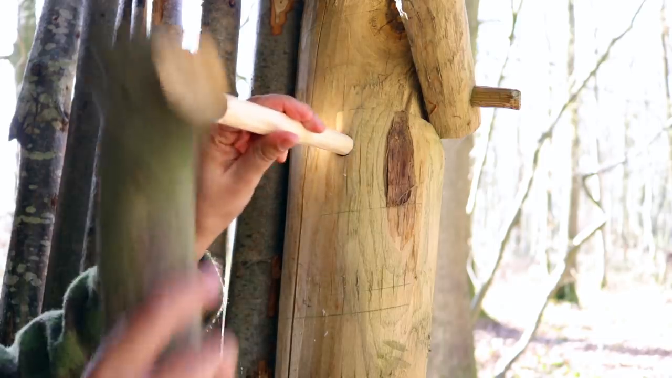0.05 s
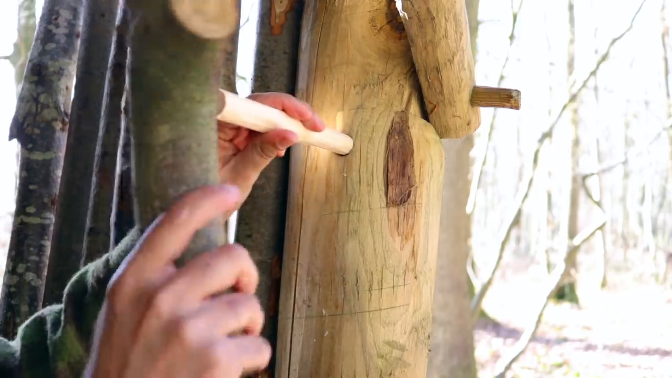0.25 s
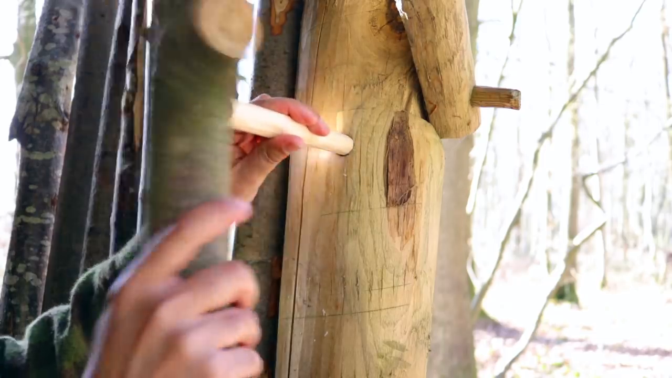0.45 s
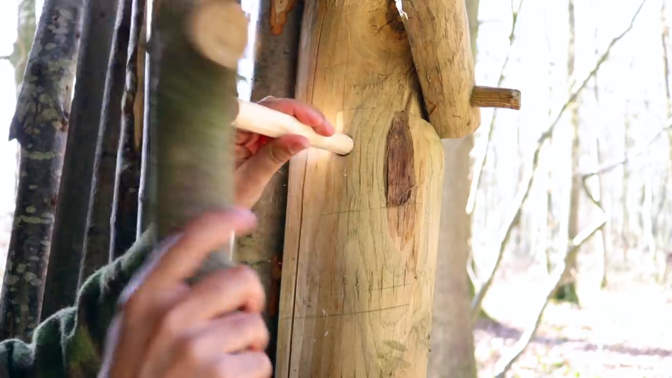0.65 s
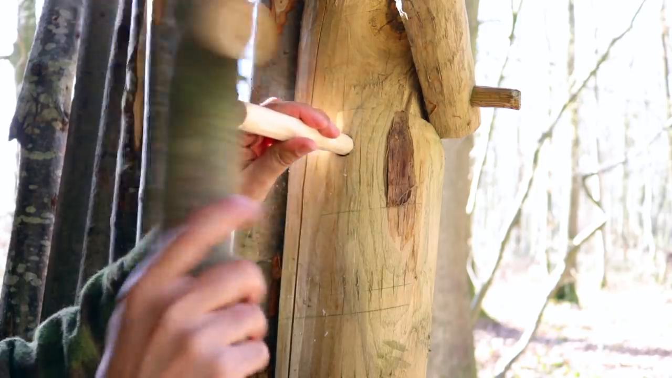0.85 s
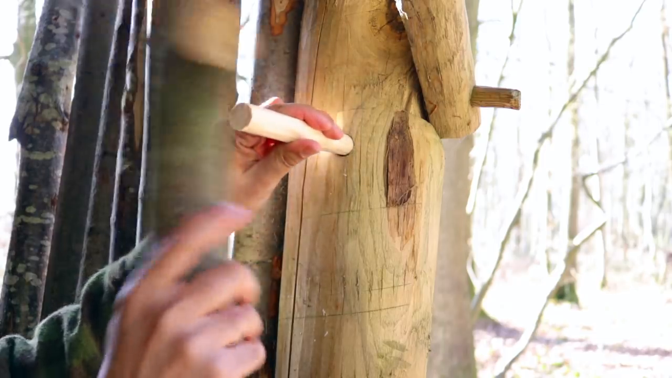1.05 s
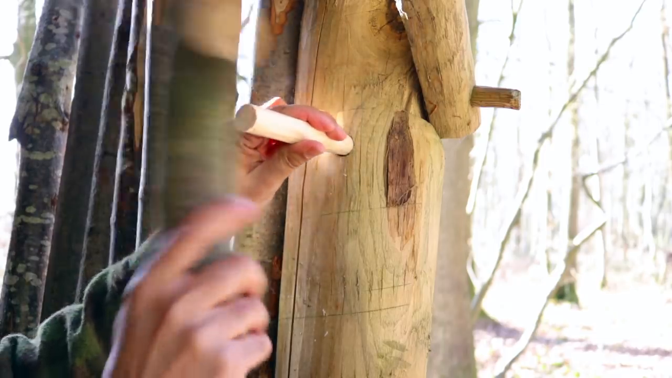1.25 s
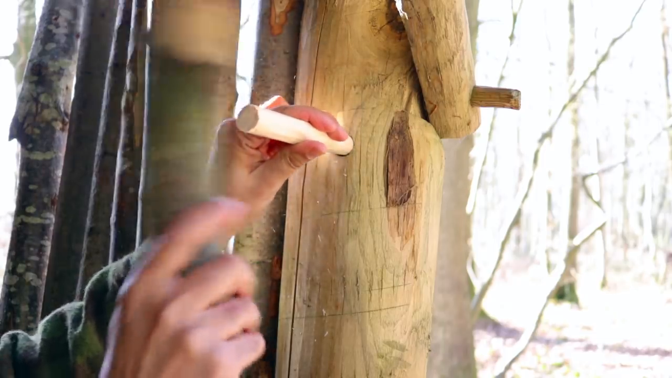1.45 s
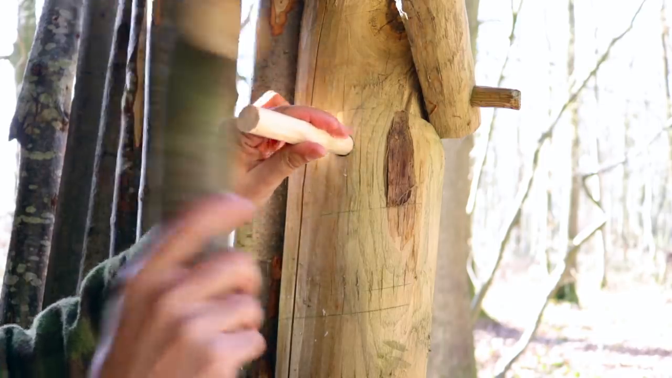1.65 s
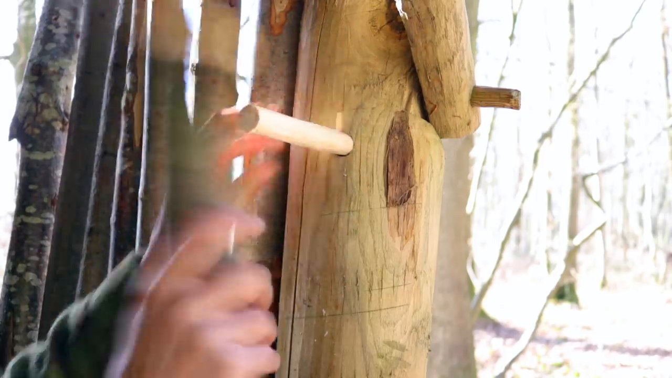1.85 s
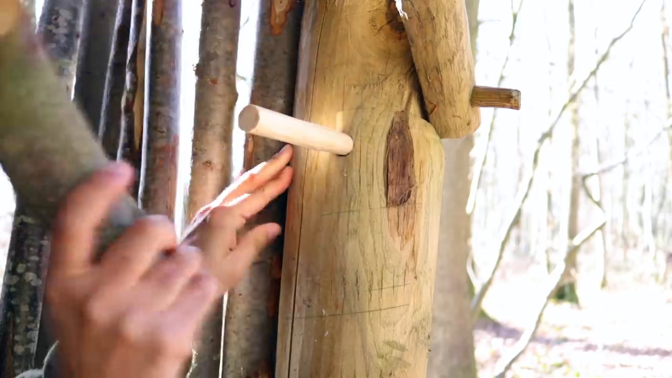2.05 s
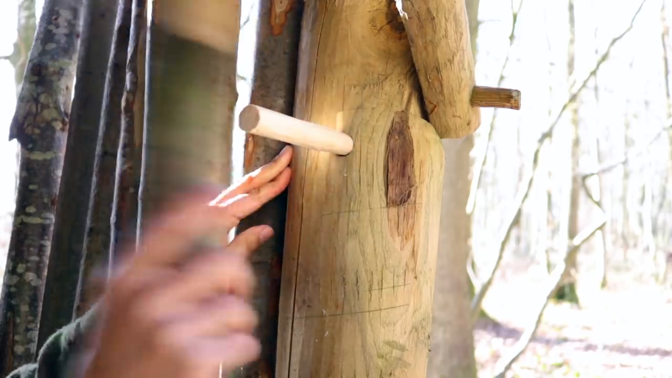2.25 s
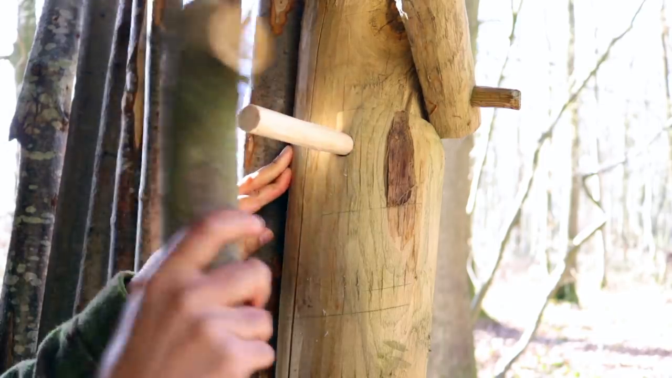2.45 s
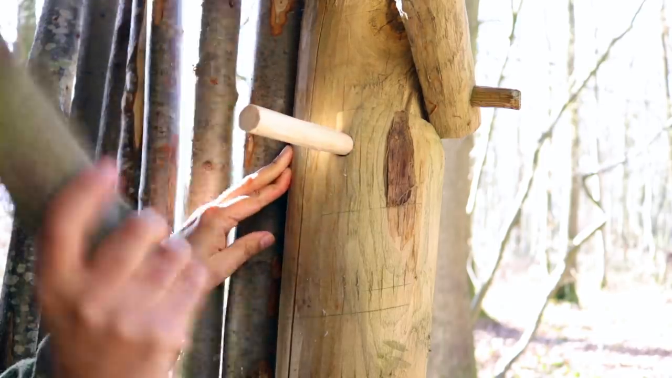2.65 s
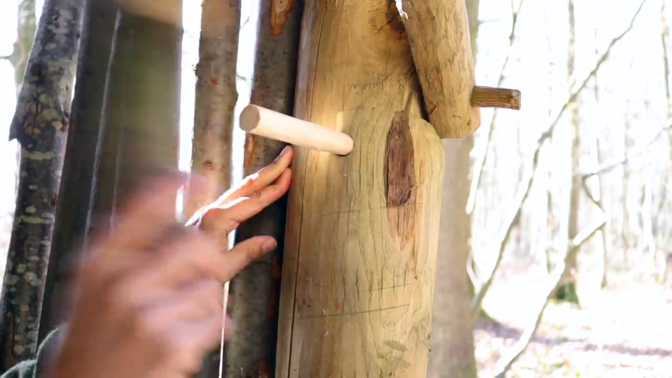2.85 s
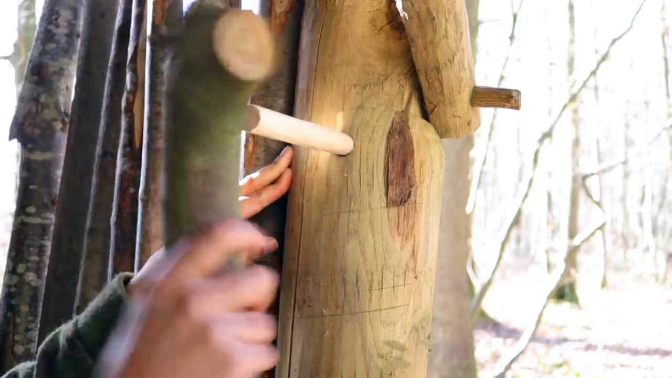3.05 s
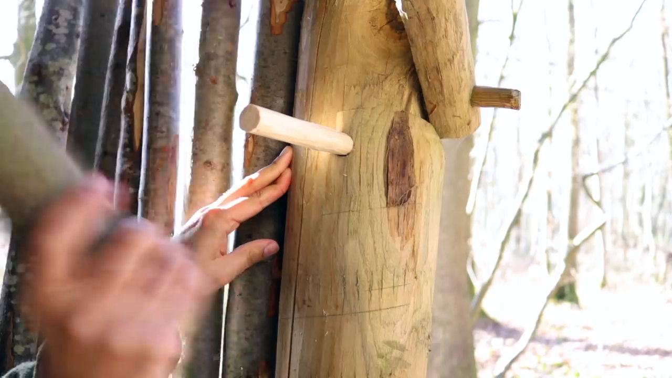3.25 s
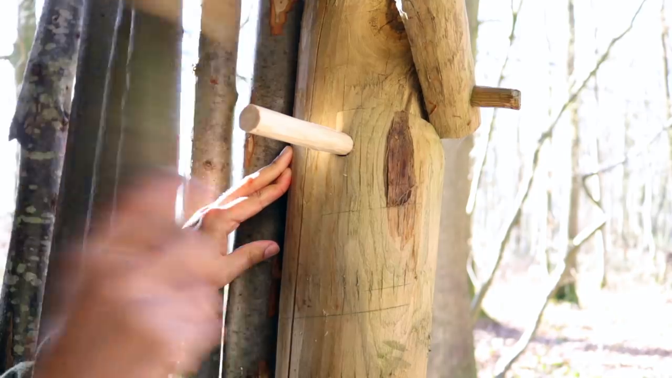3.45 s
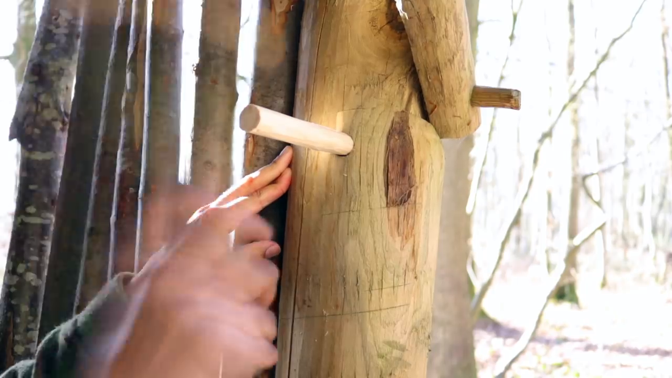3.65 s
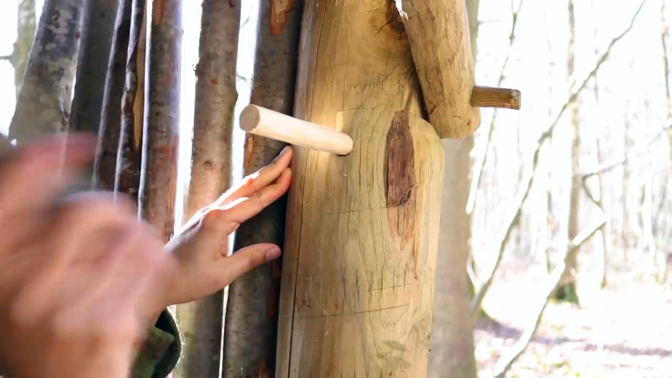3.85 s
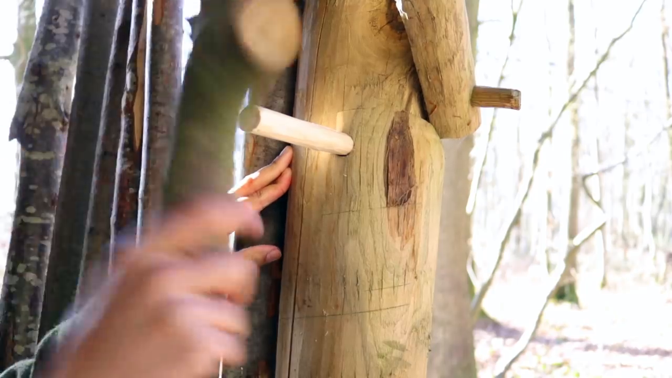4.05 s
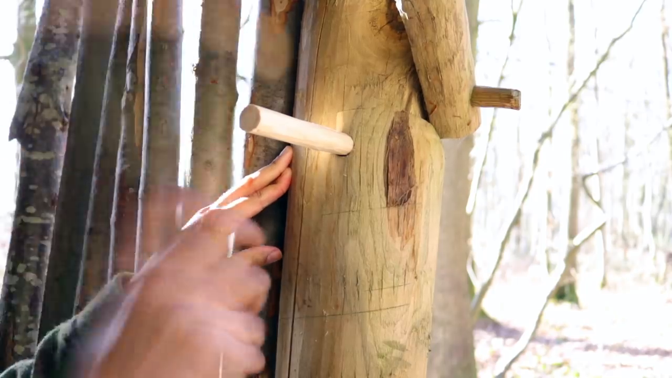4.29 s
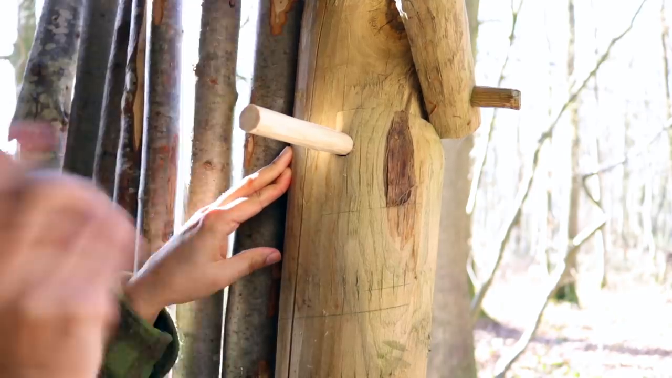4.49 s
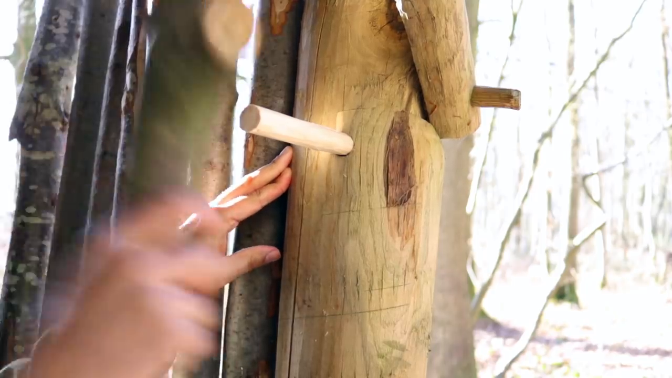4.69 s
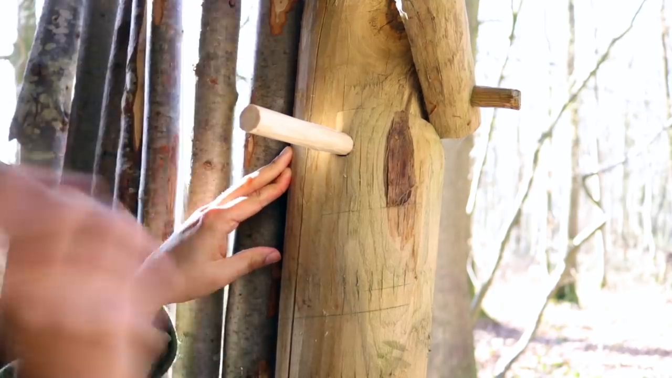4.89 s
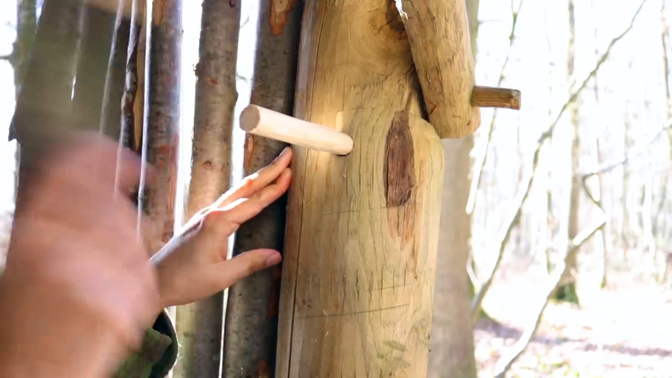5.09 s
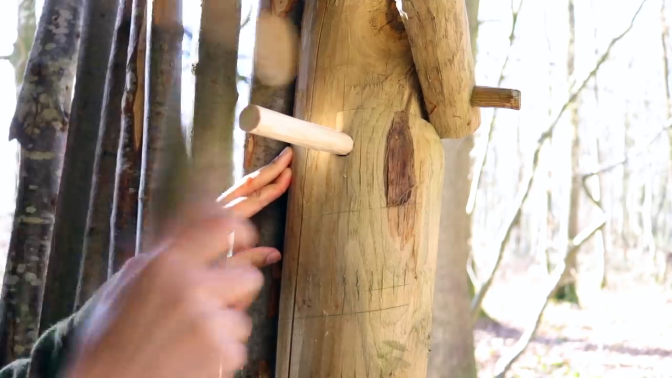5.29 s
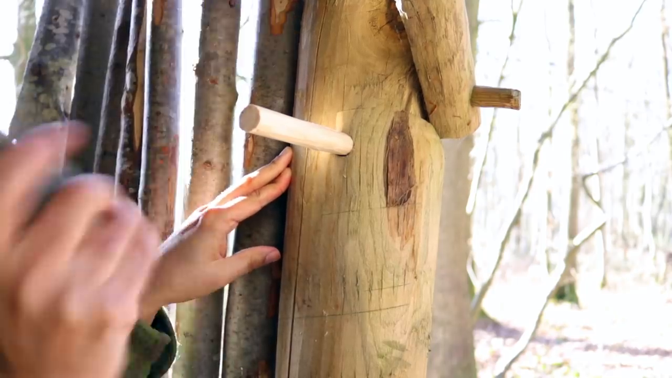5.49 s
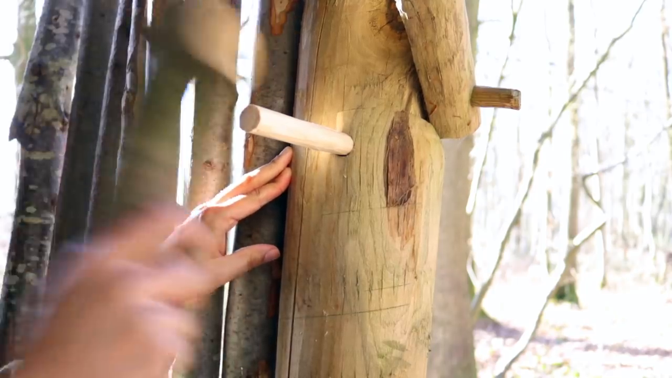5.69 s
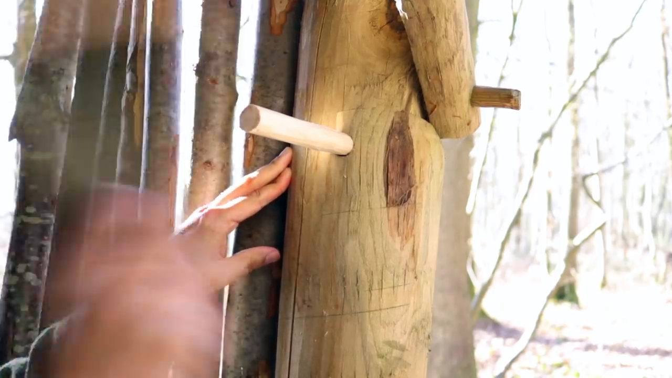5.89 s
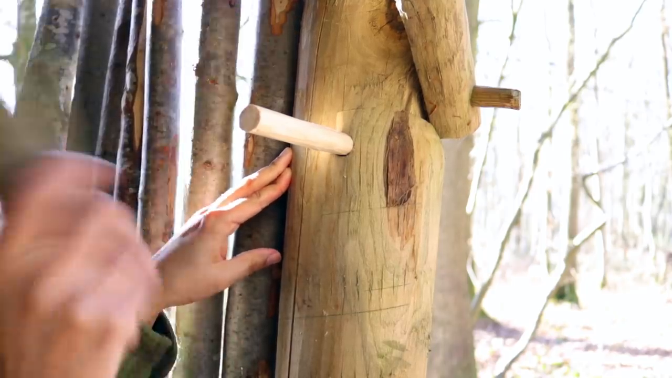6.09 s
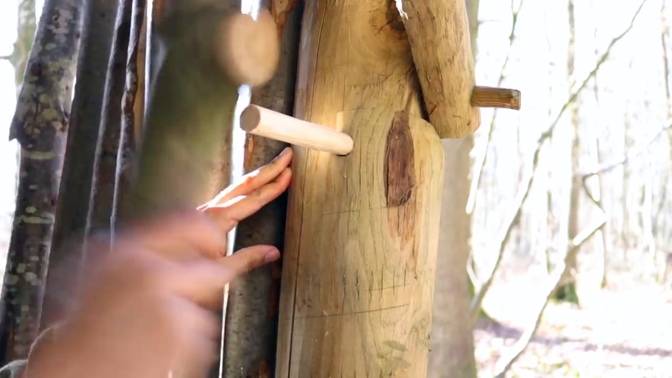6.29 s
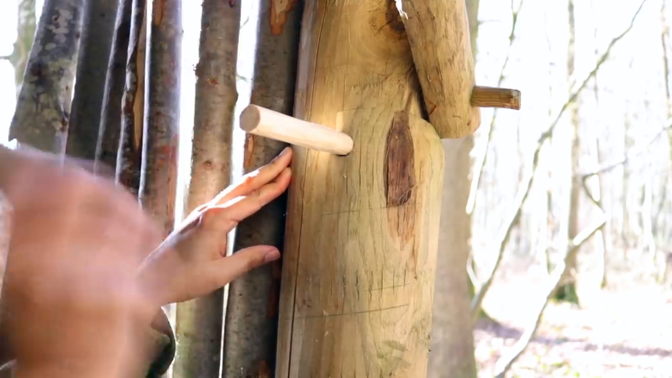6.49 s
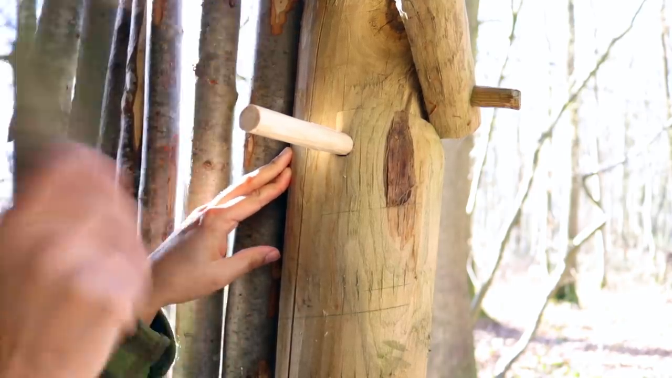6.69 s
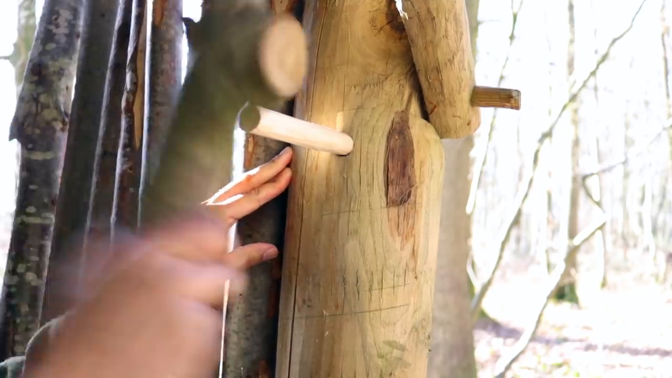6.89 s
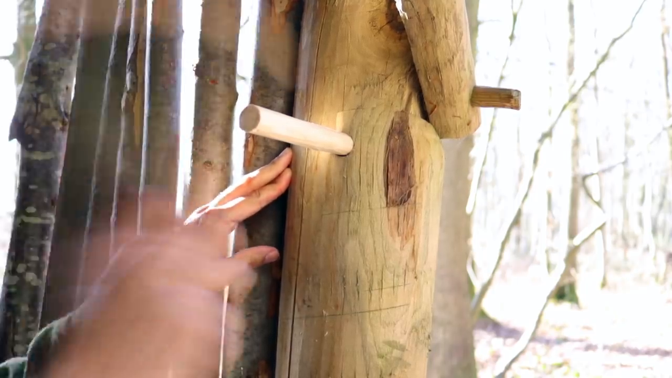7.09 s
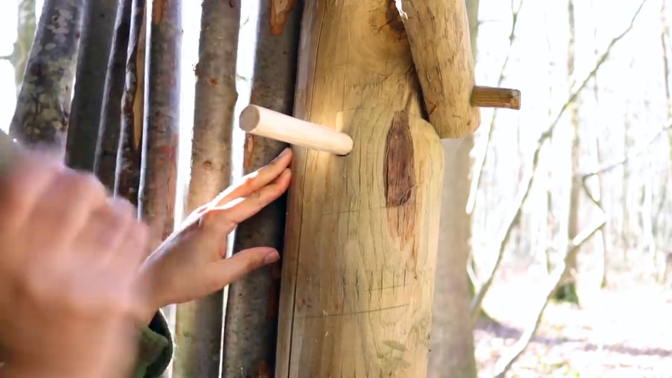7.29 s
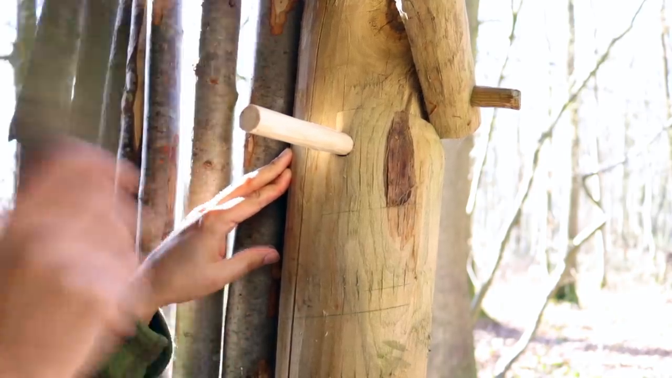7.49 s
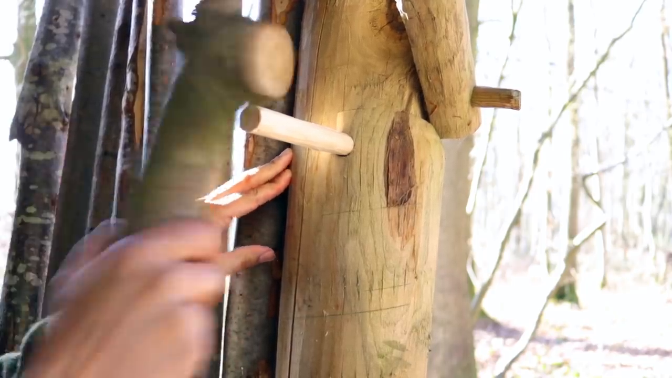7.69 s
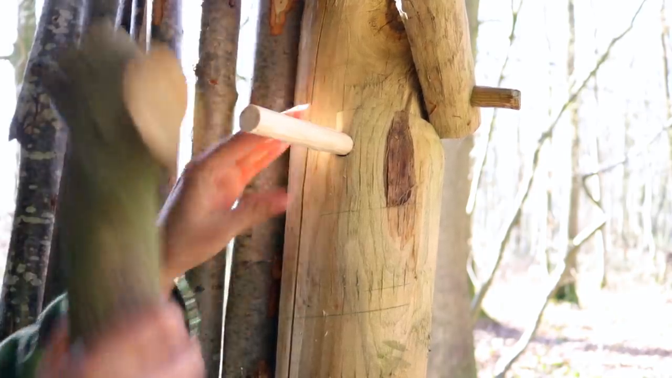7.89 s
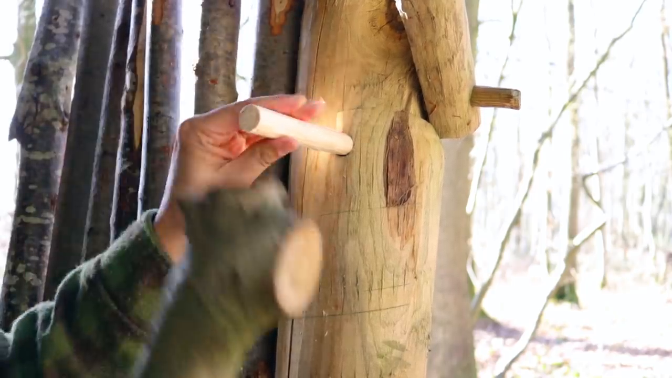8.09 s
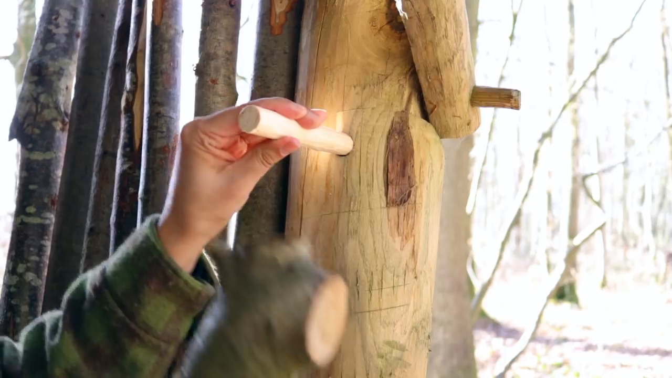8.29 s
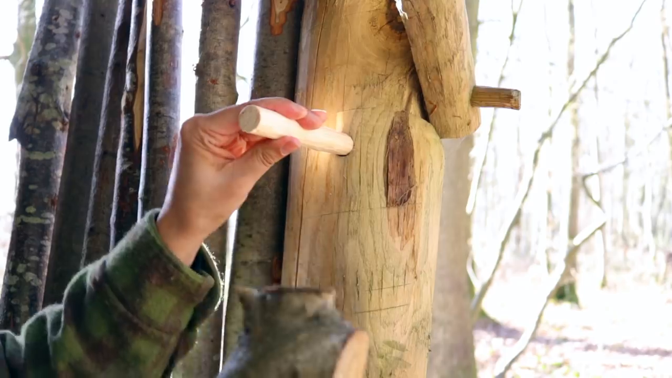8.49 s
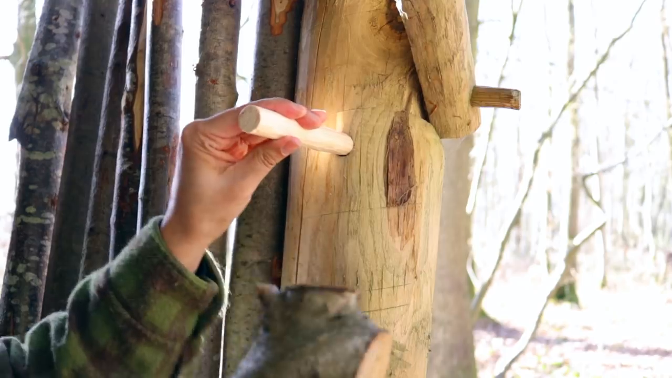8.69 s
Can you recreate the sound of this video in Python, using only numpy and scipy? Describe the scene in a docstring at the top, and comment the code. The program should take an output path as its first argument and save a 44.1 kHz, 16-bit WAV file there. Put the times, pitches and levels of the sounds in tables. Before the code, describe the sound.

A branch mallet hammers a wooden dowel into a timber post, light clacks turning to loud booming knocks, with a faint bird in quiet woodland.

```python
"""A mallet cut from a branch drives a dowel into a timber post in a wood, close to the microphone.
Each blow rings the dowel's modes; once it grips, the post's modes boom and overload the recorder.
The trunks scatter each blow back as decaying noise, and one narrow-band echo follows.
A small bird sings falling notes as gliding sine tones, over a hush of coloured noise and two faint ticks."""
import sys
import numpy as np
from scipy import signal
from scipy.fft import rfft, irfft
from scipy.io import wavfile
from scipy.ndimage import uniform_filter1d

SR = 44100
rng = np.random.default_rng(int(sys.argv[2]) if len(sys.argv) > 2 else 0)


def generate_wav(signal):
    """Clip the signal to [-1, 1] and save it as 16-bit WAV at the path in sys.argv[1]."""
    frames = np.transpose(np.atleast_2d(signal))
    scaled = np.clip(frames, -1, 1) * 32767
    pcm = np.round(scaled).astype(np.int16)
    wavfile.write(sys.argv[1], SR, pcm)


N = 385343  # samples in the scene
T = np.arange(SR) / SR  # one second of time, s
KNOCK = SR // 5  # samples in one knock


def undb(db):
    """Level: an amplitude gain is 10 to the power of dB / 20."""
    return 10 ** (np.asarray(db) / 20)


def decay(t60, t=T):
    """Exponential damping: the amplitude falls by 60 dB in each t60 seconds."""
    return np.exp(-np.log(1000) * t / t60)


def add(track, start_s, sound):
    """Superposition: pressures sum, here from a given time onwards."""
    i = int(round(start_s * SR))
    track[i:i + len(sound)] += sound[:len(track) - i]


def coloured_noise(size, points):
    """Spectral shaping: white noise weighted by (f/Hz, level/dB, ..) points, brought to an rms of 1."""
    hz, db = np.transpose(points)[:2]
    log_f = np.log(np.maximum(np.fft.rfftfreq(size, 1 / SR), 1))
    gain = undb(np.interp(log_f, np.log(hz), db))
    noise = irfft(rfft(rng.standard_normal(size)) * gain, size)
    return noise / noise.std()


def noise_tail(points, size=KNOCK):
    """Frequency-dependent damping: each band of coloured noise dies at its own rate."""
    hz, _, t60 = np.transpose(points)
    spectrum = rfft(coloured_noise(size, points))
    log_f = np.log(np.maximum(np.fft.rfftfreq(size, 1 / SR), 1))
    # overlapping triangular bands that sum to one
    weights = np.array([np.interp(log_f, np.log(hz), band) for band in np.eye(len(hz))])
    bands = irfft(spectrum * weights, size)
    return np.sum(bands * decay(t60[:, None], T[:size]), axis=0)


def ring(modes, detune, scatter_db, signs=1):
    """Modal superposition: damped cosines, whose pitch and level vary by blow, most in the high modes."""
    hz, db, t60 = np.transpose(modes)
    chance = rng.standard_normal((2, len(hz))) * np.minimum(hz / 1500, 1)
    t = T[:KNOCK]
    mode_hz = hz * (1 + detune * chance[0])
    waves = np.cos(2 * np.pi * np.outer(mode_hz, t)) * decay(t60[:, None], t)
    return (signs * undb(db + scatter_db * chance[1])) @ waves


def alternate(modes):
    """Rod modes: seen from the far end, neighbouring modes swing opposite ways."""
    return (-1) ** np.arange(len(modes))


def push(response, contact_ms):
    """Convolution with the contact force: the longer the contact, the duller the sound."""
    u = T[:SR // 100] / (contact_ms / 4000)  # the force peaks a quarter of the way through the contact
    force = u * np.exp(-u)
    return np.convolve(response, force / force.sum())[:len(response)]


# still woodland air: columns f/Hz, relative spectral level/dB per Hz
AIR_SPECTRUM = [(20, -8.5), (70, 2), (110, -3.5), (230, -3.5), (700, -5), (1100, -5), (1500, -11.5),
                (2000, -20), (2800, -25), (5000, -29.5), (9000, -35), (16000, -34.5)]


def air(level_db=-67.5, swell_db=1.15):
    """Stationary noise, slowly modulated: a low hush that swells very slightly."""
    swell = np.interp(np.arange(N), np.linspace(0, N, 20), rng.standard_normal(20))
    return coloured_noise(N, AIR_SPECTRUM) * undb(level_db + swell_db * swell)


# the short rustling ring around the clack: columns f/Hz, relative level/dB per Hz, T60/s
RATTLE_BANDS = [(50, -10, 0.06), (160, -5, 0.12), (298, -6.5, 0.16), (600, -10.5, 0.17), (1210, -2.5, 0.13),
                (2000, -0.5, 0.11), (3600, -4, 0.077), (5040, -12.5, 0.077), (15000, -13, 0.051)]


def rattle():
    """Damped noise: a short rustle in which each band has its own decay time."""
    return noise_tail(RATTLE_BANDS)


# the clack of dowel and mallet head: columns f/Hz before each blow's pitch ratio, level/dB, T60/s
DOWEL_MODES = [(600, -14.5, 0.012), (1055, -7.5, 0.0095), (1317, -6.5, 0.013), (1610, -10, 0.016),
               (2055, -9.5, 0.014), (2885, -17, 0.016), (3400, -15, 0.013)]


def dowel(pitch, home_ms, home_share=0.4, rattle_db=-28, radiate_hz=420):
    """Double impact: mallet on dowel, then dowel in its hole. So small a peg radiates little bass."""
    modes = [(hz * pitch, db, t60) for hz, db, t60 in DOWEL_MODES]
    clack = ring(modes, detune=.02, scatter_db=1., signs=alternate(modes))
    radiation = signal.butter(1, radiate_hz, "high", fs=SR, output="sos")
    clack = signal.sosfilt(radiation, clack)
    both = clack + undb(rattle_db) * rattle()
    add(both, home_ms / 1000, home_share * clack)
    return both


POST_DETUNE, POST_SCATTER_DB = .005, 1.2  # fraction of pitch, dB

# the tightly gripped dowel under a hard blow: columns f/Hz, level/dB, T60/s
CRACK_MODES = [(2050, -9, 0.024), (2867, -16.5, 0.044), (3400, -6, .016), (4830, -9, .013),
               (6050, -11, 0.014), (8700, -21.5, 0.021)]


def crack(contact_ms):
    """Forced modal response: the contact force rings the high modes of the gripped dowel."""
    modes = ring(CRACK_MODES, POST_DETUNE, POST_SCATTER_DB, signs=alternate(CRACK_MODES))
    return push(modes, contact_ms)


# the dense, quickly dying ring of the wood fibres: columns f/Hz, relative level/dB per Hz, T60/s
GRAIN_BANDS = [(60, -11, 0.04), (201, -10.5, 0.13), (463, -6.5, 0.34), (960, -7.5, 0.18),
               (2000, -9.5, 0.072), (3300, -8.5, 0.1), (4860, -18.5, 0.078), (7000, -16.5, 0.037),
               (11100, -22.5, 0.022), (15000, -40, .06)]


def wood_grain():
    """High modal density: modes too close to tell apart amount to damped noise."""
    return noise_tail(GRAIN_BANDS)


# the post and the timber joined to it: columns f/Hz, level/dB (at a 0 dB blow below 110 Hz), T60/s
POST_MODES = [(64, -41.5, 0.064), (95, -30, 0.04), (115.4, -29.5, 0.035), (159.2, -20, 0.079),
              (249.4, -22.5, 0.071), (304, -28, 0.13), (373.4, -27.5, 0.13), (407.8, -12.5, 0.062),
              (485.3, -21, 0.079), (520, -12.5, 0.095), (546.2, -6.5, 0.031), (651.4, -5.5, .05),
              (693.3, -6, 0.06), (753, -18, 0.097), (880.4, -16, 0.046), (915, -27, 0.09),
              (1028.4, -35.5, 0.014), (1257, -37, 0.2), (1610, -13.5, 0.066), (1801, -13, 0.063),
              (1984, -1, 0.027), (2290, -27, 0.14), (3010, -7.5, .04), (2902, -20.5, 0.013),
              (3340, -23, 0.1), (3694, -16.5, 0.021), (4150, -25.5, 0.035), (5840, -32, 0.033)]


def post(blow_db, contact_ms, timber, sway=1., softening=2.655, grain_db=-28, crack_db=-1, own_share=.6):
    """Modal excitation: the post booms under the crack; only hard blows set its lowest modes swaying."""
    modes = [(hz, db + sway * blow_db * (hz < 110), t60) for hz, db, t60 in POST_MODES]
    # the dowel yields in its hole, which lengthens the push
    boom = push(ring(modes, POST_DETUNE, POST_SCATTER_DB), contact_ms * softening)
    cracking = crack(contact_ms)
    # the same timber answers every blow, but never in quite the same way
    grain = push(timber + own_share * wood_grain(), contact_ms / 2)
    return undb(blow_db) * (boom + undb(crack_db) * cracking + undb(grain_db) * grain)


# fibres of the hole breaking: columns f/Hz, relative spectral level/dB per Hz
SNAP_SPECTRUM = [(1000, -20), (4000, -4.5), (9000, 0), (16000, -9.5)]


def fibre_snap(start_s, force_db, level_db=-36, t60=0.0085, most_at_s=1.49, span_s=0.27):
    """Fracture noise: fibres snap as the dowel bites, most in the blows around one moment."""
    biting = np.exp(-((start_s - most_at_s) / span_s) ** 2)
    return biting * undb(level_db + force_db) * coloured_noise(SR, SNAP_SPECTRUM) * decay(t60)


# how the trunks scatter sound back: columns f/Hz, level/dB relative to the knock's spectrum, T60/s
FOREST_BANDS = [(50, 9, 1), (205, 0.5, 0.82), (464, -6, 0.83), (756, -6, 0.61), (1170, -2, 0.23),
                (1770, -3, 0.9), (2100, -7, 0.98), (2690, -3, 0.66), (3520, -2, 0.9), (4200, -8.5, 0.27),
                (7000, -13, 0.94), (15000, -12.5, .25)]


def trunks(knock, scatter_db=-70, patchy_db=2, onset_t60=.05):
    """Multiple scattering: many trees keep the broad colour of a knock but blur its ring, patchily."""
    hz, db, t60 = np.transpose(FOREST_BANDS)
    power = np.abs(rfft(knock)) ** 2
    f = np.fft.rfftfreq(KNOCK, 1 / SR)
    knock_db = [10 * np.log10(power[np.abs(f - centre) < centre / 4].mean()) for centre in hz]
    bands = np.transpose([hz, db + knock_db, t60])
    wash = noise_tail(bands, size=SR) * (1 - decay(onset_t60))
    patches = np.interp(T, np.linspace(0, 1, 120), rng.standard_normal(120))
    return np.linalg.norm(knock) * wash * undb(scatter_db + patchy_db * patches)


# the dowel is loose until it bites; from then on its slack dies away
BITE_S, TIGHTEN_S = 1.22, 0.35
# a loose dowel passes little of a blow to the post; a gripped one clacks less
LOOSE_POST_DB, GRIPPED_DOWEL_DB = -29.5, -3.5
# at a force of 0 dB: mallet contact and delay until the dowel hits home; both shorten as a power of force
CONTACT_MS, CONTACT_POWER = 0.26, .45
HOME_MS, HOME_POWER = 1.45, .4
CUSHION_MS = .45  # extra contact time on the post when the dowel is quite loose
# once the mallet rebounds and lands again, softly, on the seated dowel
REBOUND_S, REBOUND_DB, REBOUND_CONTACT_MS = 3.4361, -6, 0.54

# mallet blows: columns t/s, relative force level/dB, dowel pitch ratio
BLOWS = [(0.4744, -6.5, 0.95), (0.6681, 1, 0.91), (0.853, -0.5, 0.92), (1.0458, 1, 0.83),
         (1.2402, 3.5, 0.95), (1.435, 2.5, 0.96), (1.621, 1, 0.94), (1.925, -1, 0.98), (2.2083, 1.5, 1.21),
         (2.5012, 2, 0.9), (2.799, 0.5, 1.07), (3.0899, 5.5, 0.89), (3.3907, 5.5, 0.93),
         (3.7245, 3.5, 0.85), (4.0412, 4.5, 0.92), (4.3653, 4, 1.35), (4.696, 3.5, 1.37), (5.0207, 3, 1.27),
         (5.3524, 4.5, .84), (5.6708, 4, 0.86), (5.989, 2, 1.12), (6.2977, 5, 0.84), (6.6173, 3.5, 0.99),
         (6.9015, 2.5, .83), (7.1715, 3, 1.3), (7.438, 3.5, 0.87), (7.6903, 6, .77)]


def hammering(post_lag_ms=.3):
    """Impact transmission: each blow passes down the dowel into the post, more so as the dowel tightens."""
    out = np.zeros(N)
    timber = wood_grain()
    for start_s, force_db, pitch in BLOWS:
        slack = np.exp(-max(start_s - BITE_S, 0) / TIGHTEN_S)  # 1 loose, towards 0 gripped
        contact_ms = CONTACT_MS / undb(force_db) ** CONTACT_POWER
        home_ms = HOME_MS / undb(force_db) ** HOME_POWER
        clack_db = force_db + GRIPPED_DOWEL_DB * (1 - slack)
        knock = undb(clack_db) * push(dowel(pitch, home_ms), contact_ms)
        post_db = force_db + LOOSE_POST_DB * slack
        boom = post(post_db, contact_ms + CUSHION_MS * slack, timber)
        add(knock, post_lag_ms / 1000, boom)
        add(out, start_s, knock)
        add(out, start_s, fibre_snap(start_s, force_db))
        add(out, start_s, trunks(knock))
    add(out, REBOUND_S, post(REBOUND_DB, REBOUND_CONTACT_MS, timber, crack_db=-6))
    return out


def echo(knocks, delay_s=.156, level_db=-37, band_hz=(1380, 1670)):
    """Discrete reflection: one delayed, narrow-band copy from further off."""
    out = np.zeros(N)
    band = signal.butter(2, band_hz, "band", fs=SR, output="sos")
    add(out, delay_s, undb(level_db) * signal.sosfilt(band, knocks))
    return out


LOW_AFTER_S, LOW_DB = .123, 3  # the low note follows the high one, this much louder
HIGH_PEAK_S, LOW_PEAK_S = .056, .022  # when each note is loudest, from its start
NOTE_FADE_DB_PER_S = 240  # fade to either side of that peak

# the bird's two falling notes, before smoothing and a slight chance detuning: columns t/s into the note, f/Hz
HIGH_NOTE = [(0, 6550), (.022, 7000), (.035, 6736), (.05, 5400), (.072, 4567)]
LOW_NOTE = [(0, 4500), (.03, 3600), (.055, 2788), (.08, 2420)]
# each pair of notes: columns t/s, peak level of the high note/dB
SONG = [(1.964, -68), (2.266, -62.5), (2.552, -62.5), (2.846, -62.5)]


def whistle(note, level_db, peak_s):
    """Frequency modulation: the phase of a pure tone is the running sum of its gliding pitch."""
    s, hz = np.transpose(note)
    t = T[T < s[-1]]
    glide = uniform_filter1d(np.interp(t, s, hz), size=300)
    pitch = glide * (1 + 0.0038 * rng.standard_normal())
    loudness = undb(level_db - NOTE_FADE_DB_PER_S * np.abs(t - peak_s))
    loudness = loudness * signal.windows.tukey(len(t), .1)
    return loudness * np.sin(2 * np.pi * np.cumsum(pitch) / SR)


def bird(wet_db=-38, t60=0.46):
    """Reverberation: whistles, high then low, convolved with decaying noise, as smeared by the trees."""
    out = np.zeros(N)
    for start_s, level_db in SONG:
        add(out, start_s, whistle(HIGH_NOTE, level_db, HIGH_PEAK_S))
        add(out, start_s + LOW_AFTER_S, whistle(LOW_NOTE, level_db + LOW_DB, LOW_PEAK_S))
    smear = signal.fftconvolve(out, rng.standard_normal(SR) * decay(t60))[:N]
    return out + undb(wet_db) * smear


# small dry ticks: columns t/s, level/dB
TICKS = [(2.681, -50), (3.567, -58)]


def ticks(t60=0.01):
    """Damped noise bursts: faint dry clicks between the blows."""
    out = np.zeros(N)
    for start_s, level_db in TICKS:
        click = coloured_noise(SR, [(300, 2), (3000, 2), (15000, -18)])
        add(out, start_s, undb(level_db) * click * decay(t60))
    return out


def scene():
    """Superposition of independent sources: hammering among the trees, with bird, ticks and air behind."""
    knocks = hammering()
    return (knocks + echo(knocks) + bird() + ticks() + air())[None]


def record(dry, low_cut_hz=36, overload=.58, top_hz=16200):
    """Saturation: the microphone sheds deep bass, the input flattens hard blows, then the top is cut."""
    dry = signal.sosfilt(signal.butter(2, low_cut_hz, "high", fs=SR, output="sos"), dry)
    # twice the sample rate while flattening, to limit aliasing
    fine = signal.resample_poly(dry, 2, 1, axis=-1) / overload
    flat = overload * fine / (1 + fine ** 8) ** (1 / 8)
    low_pass = signal.ellip(10, .1, 80, top_hz, fs=SR, output="sos")
    return signal.sosfilt(low_pass, signal.resample_poly(flat, 1, 2, axis=-1))


dry = scene()
out = record(dry)
generate_wav(out)
```